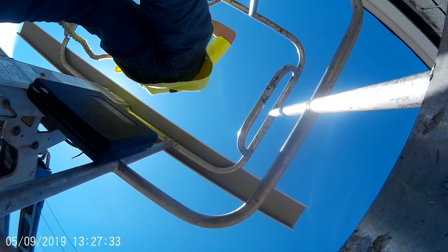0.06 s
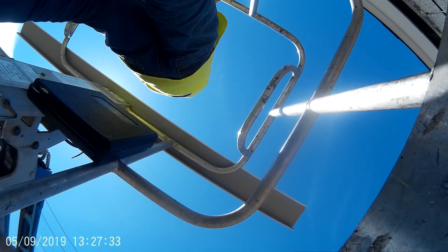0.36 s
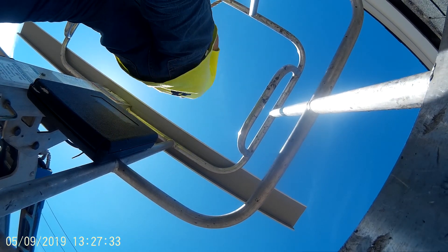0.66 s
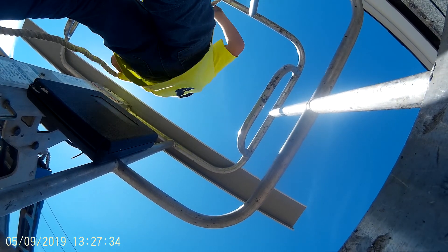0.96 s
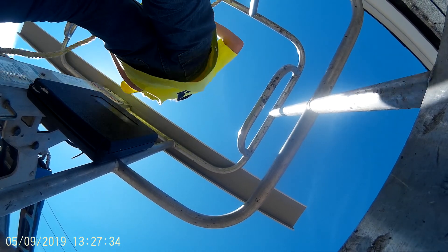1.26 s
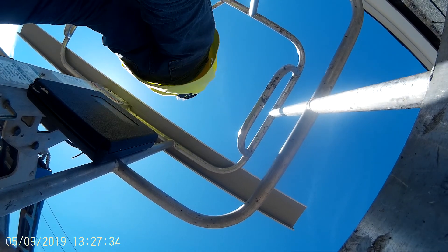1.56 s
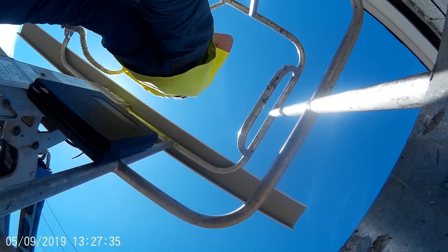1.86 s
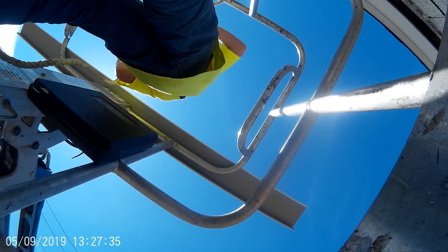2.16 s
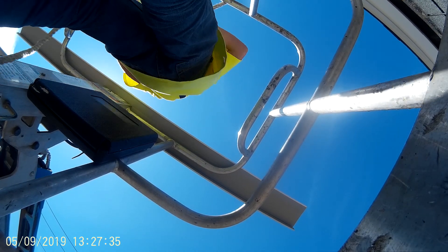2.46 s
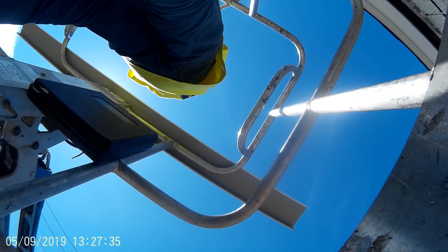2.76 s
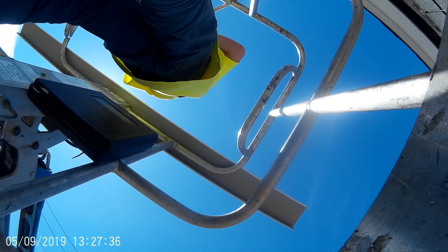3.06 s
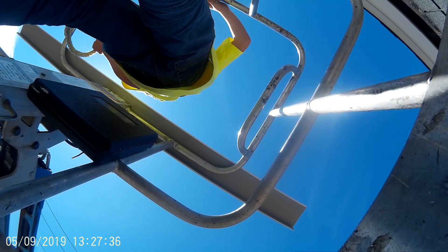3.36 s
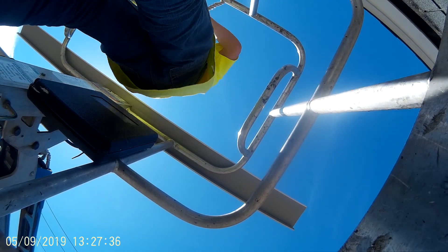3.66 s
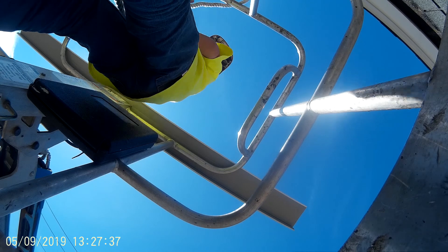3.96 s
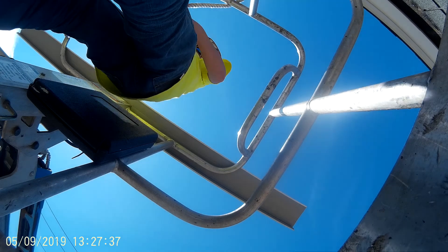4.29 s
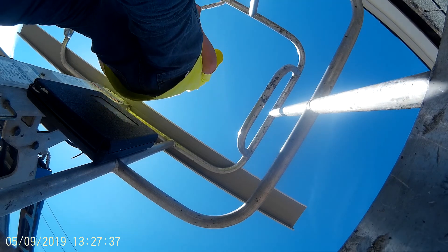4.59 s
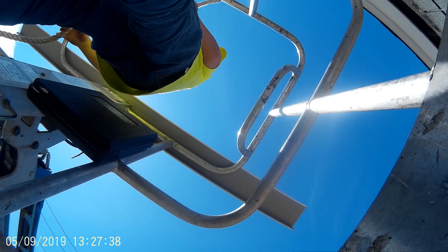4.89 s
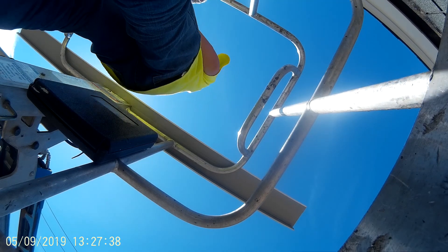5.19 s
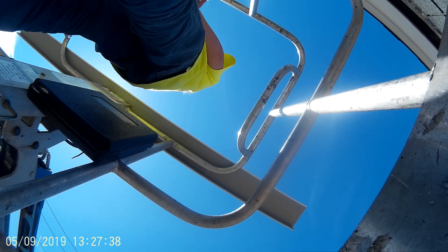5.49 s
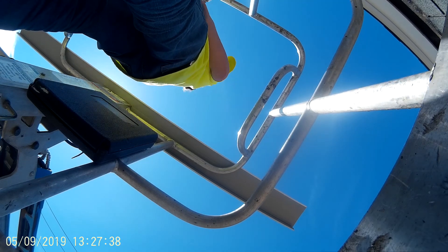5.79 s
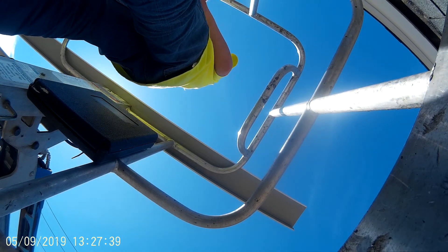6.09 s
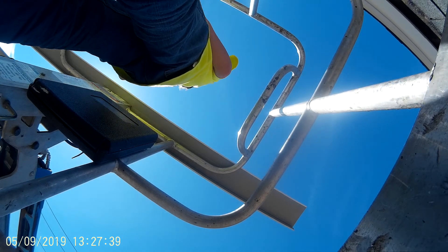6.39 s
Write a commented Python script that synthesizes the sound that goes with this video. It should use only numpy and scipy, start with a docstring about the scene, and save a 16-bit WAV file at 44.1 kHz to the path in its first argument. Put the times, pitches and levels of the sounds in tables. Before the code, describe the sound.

Heard in mono right on a metal hoist carriage outdoors, rope scrapes across an edge about twice a second, making the frame rumble and knock hollowly. A little past halfway, a harder knock and a sharp steel snap end the hauling. The rope then only scuffs now and then, and a loose fitting rattles lightly around a single ringing clank near the end. Faint open air lies underneath.

```python
"""First, right at the microphone, a rope rasps over the metal carriage of a ladder hoist: a worker on a
roof is hauling it hand over hand. Each pull rumbles in the frame, rasps as the strands slip over its
edge, and hisses with loose fibres. The carriage knocks in its play and a loose steel fitting snaps
against it; then come short scuffs, light rattles and one bright metal clank. Behind it all, quiet
outdoor air. Heard in mono from the carriage itself."""
import sys
import numpy as np
from scipy import signal
from scipy.fft import rfft, irfft
from scipy.io import wavfile
from scipy.ndimage import uniform_filter1d

SR = 44100
rng = np.random.default_rng(int(sys.argv[2]) if len(sys.argv) > 2 else 0)


def unload_audio(sound):
    """Save the sound as a 16-bit wav file, at the path given as the first command line argument."""
    columns = np.transpose(np.atleast_2d(sound))
    # keep every value between -1 and 1, then stretch to whole-number steps
    steps = np.round(np.clip(columns, -1, 1) * 32767)
    wavfile.write(sys.argv[1], SR, steps.astype(np.int16))


N = 288414
TIME = np.arange(N) / SR
BINS = np.fft.rfftfreq(8192, 1 / SR)

# Levels in the tables are relative; each source sets its own gain.
# open air around the roof: f/Hz, level/dB
AIR_SPECTRUM = [(15, -56.5), (25, -5), (119, 0.5), (340, -5), (537, -9), (1490, -17), (2850, -21),
                (5280, -26), (9050, -27), (9810, -26), (15500, -30.5)]
# faint hum and whine in the background: f/Hz, level/dB
HUM_TONES = [(113, -59), (9491, -100.5), (9561, -99)]

# resonances of the carriage frame: f/Hz, width/Hz, level/dB
FRAME_MODES = [(113,8,-8), (172,12,-11), (243,22,-7), (343,22,1), (497,30,-2), (545,26,-1), (640,35,-5),
               (917,38,-3), (1043,20,-13), (1282,18,-13), (1588,24,-9), (1793,20,-9), (1875,28,-8.5),
               (1978,30,-10), (2482,26,-15), (2616,26,-13), (2780,28,-22), (3890,45,-19), (4110,45,-20),
               (4315,45,-17), (4530,32,-23), (5040,70,-28)]
# the frame's broad response between them: f/Hz, level/dB
FRAME_BODY = [(24,-63), (40,-25), (85,-13), (160,-7.5), (286,-0.5), (395,-4.5), (530,-2), (780,-7),
              (1100,-8.5), (1400,-10), (1800,-6), (2110,-17), (2450,-8.5), (3080,-20), (4200,-23),
              (7000,-52), (15000,-67.5)]
# dull knocks of the carriage in its play: t/s, level/dB, f/Hz, swell/s
CARRIAGE_KNOCKS = [(0.338,-29,524,0.0061), (0.786,-22.5,523,0.0049), (1.201,-22,646,0.0097),
                   (1.787,-20,568,0.0037), (1.872,-28.5,504,0.0073), (1.957,-20.5,343,0.0047),
                   (2.053,-31,145,0.012), (2.61,-20,540,0.0031), (3.356,-41,470,0.0076),
                   (3.771,-12.5,638,0.0075), (3.8135,-5,600,0.0045), (4.978,-30,378,0.0045),
                   (5.0,-40,628,0.01), (5.69,-26.5,567,0.0061), (5.711,-21,561,0.0072),
                   (5.726,-23.5,521,0.0074), (5.752,-26,510,0.0074)]

# a loose steel fitting snaps against the carriage and bounces: t/s, level/dB, decay/s
FITTING_SNAPS = [(3.857,-13,0.0069), (3.892,-21.5,0.014), (3.931,-28.5,0.002)]
# the crack of that contact: f/Hz, level/dB
SNAP_SPECTRUM = [(120, -22), (200, -43), (671, -2.5), (1460, -13.5), (2460, -12.5), (3290, -14.5),
                 (3600, -19), (4640, -13.5), (6300, -32.5), (10800, -40.5), (15000, -54)]
# light rattles of the fitting: t/s, level/dB, decay/s
FITTING_RATTLES = [(6.026,-39,0.0067), (6.273,-43.5,0.016), (6.431,-43,0.0087), (6.467,-37.5,0.0074),
                   (6.508,-38.5,0.0095)]
# their duller contact: f/Hz, level/dB
RATTLE_SPECTRUM = [(120, -36), (200, -29), (646, 1), (1400, -17.5), (1850, -12.5), (2590, -25), (2890, -40),
                   (3760, -38), (8000, -47), (10400, -77), (17600, -120)]
# the fitting's ring: f/Hz, level/dB, t60/s
FITTING_MODES = [(780,-4,0.2), (835,-4,0.18), (931,-2,0.17), (1090,-4,0.2), (1340,-10,0.2), (1663,-15,0.18)]
# the clank, metal striking metal and chattering: t/s, level/dB, decay/s
CLANK_BLOWS = [(6.288, -5.5, 0.022), (6.301, -14.5, 0.0076), (6.311, -11.5, 0.0096)]
# the crash of that contact: f/Hz, level/dB
CLANK_SPECTRUM = [(59, -50), (100, -21), (391, -11), (472, -26), (764, -15.5), (904, -2), (1260, -21),
                  (1840, 1), (2050, -15), (2470, 0), (2920, -18.5), (3920, -5), (4640, -20), (8880, -30),
                  (15000, -42)]
# the struck metal's ring: f/Hz, level/dB, t60/s
CLANK_MODES = [(969,-15,0.18), (1367,-8,0.26), (1507,-12,0.19), (1600,-5,0.08), (1793,-7,0.13),
               (1857,-3,0.08), (2460,-9,0.13), (2670,-6,0.08), (2902,-15,0.1), (3058,-18,0.22),
               (3612,-13,0.094), (3800,-4,0.16), (3860,-6,0.09), (4317,-12,0.17), (5003,-13,0.14),
               (5560,-17,0.18), (6540,-24,0.2), (8393,-25,0.15), (9044,-20,0.09)]

# hiss of rubbing fibres: f/Hz, level/dB
FIBRE_SPECTRUM = [(2060, -31), (3500, -4), (4250, -16.5), (4900, -6.5), (6860, -13), (8160, -10.5),
                  (9240, -13), (10100, -16), (11600, -15.5), (15500, -30)]
# the slack rope creeps between scuffs: start/s, end/s, rumble/dB, rasp/dB, hiss/dB
ROPE_CREEP = (4.4, 5, -53, -71, -74.5)
# pulls: full speed from/s, until/s, rise/(dB/s), fall/(dB/s), rumble/dB, rasp/dB, hiss/dB
ROPE_PULLS = [(0.0, 0.348, 202, 232, -37, -47, -53.5), (.88, 1.061, 146, 178, -26.5, -41, -51),
              (1.178, 1.21, 150, 104, -37, -48.5, -56), (1.418, 1.544, 244, 175, -25, -42, -51),
              (1.97, 2.263, 106, 197, -34, -47.5, -53.5), (2.568, 2.693, 129, 167, -27, -41, -51.5),
              (3.099, 3.242, 168, 130, -31, -46, -53), (3.738, 3.815, 214, 520, -23.5, -33.5, -48),
              (3.872, 3.908, 900, 230, -27.5, -41, -51.5)]
# the rope bites into the edge at the height of a pull: t/s, half length/s, rasp/dB
ROPE_BITES = [(0.894, 0.019, -33), (.978, 0.015, -26.5), (1.035, 0.0071, -30), (1.506, 0.036, -26),
              (2.21, 0.033, -43), (2.598, 0.0099, -32.5), (2.662, 0.0091, -30), (2.70, 0.02, -24),
              (3.197, 0.014, -36), (3.221, .01, -36.5), (3.796, .018, -25.5)]
# scuffs as the rope is gripped or the load settles: t/s, rise/s, decay/s, rumble/dB, rasp/dB, hiss/dB
ROPE_SCUFFS = [(1.784, 0.0033, 0.037, -30.5, -40, -56), (4.233, 0.0031, 0.064, -35.5, -50, -68),
               (4.257, 0.018, 0.037, -27.5, -32.5, -49), (4.419, 0.0075, 0.065, -43, -62, -62.5),
               (4.606, 0.003, 0.056, -45, -62, -65), (4.70, 0.035, 0.075, -38, -55.5, -70),
               (4.755, .004, 0.017, -31.5, -34.5, -74), (4.877, .003, 0.12, -48.5, -63, -76),
               (4.958, 0.022, 0.049, -29.5, -46.5, -61), (5.094, 0.0066, 0.032, -26, -32, -49.5),
               (5.32, 0.013, 0.036, -46, -74, -78), (5.682, 0.022, 0.045, -29, -43, -50.5),
               (5.911, 0.0059, 0.026, -45.5, -71, -69.5)]
# sharp catches of the rope on the frame: t/s, rasp/dB, rumble/dB, hiss/dB
ROPE_CATCHES = [(0.001, -40, -21.5, -63), (0.028, -26, -38, -68), (0.05, -26.5, -23.5, -69),
                (0.86, -39, -22.5, -47), (0.952, -24.5, -23, -45), (1.2, -41, -21, -60),
                (1.61, -41, -36, -43), (2.017, -35.5, -27, -60), (2.184, -33.5, -28.5, -57),
                (2.38, -49, -35, -70), (2.44, -66, -33, -67), (2.541, -32.5, -34, -54),
                (2.636, -38, -48, -37), (2.915, -50, -46, -80), (3.02, -41, -51, -52),
                (3.04, -37, -47, -45), (3.05, -34.5, -44, -44.5), (3.172, -37, -23, -50),
                (3.356, -37.5, -27.5, -64), (3.629, -37, -39, -52), (3.711, -49, -43, -55),
                (3.735, -22, -35, -42)]


def amp(db):
    """Decibels to gain."""
    return 10 ** (np.asarray(db) / 20)


def unit(x):
    """Scales to rms 1."""
    return x / np.sqrt(np.mean(x ** 2) + 1e-20)


def shape(points):
    """Gain at every bin from points of f/Hz, level/dB."""
    hz, db = np.transpose(points)
    return amp(np.interp(np.log(BINS + 1), np.log(hz + 1), db))


def colour(x, gain):
    """Minimum-phase filter shaped like the gain, keeping the power of white noise."""
    log_gain = np.log(np.maximum(unit(gain), 1e-5))
    mirrored = np.concatenate([log_gain, log_gain[-2:0:-1]])
    taps = np.fft.ifft(np.exp(np.conj(signal.hilbert(mirrored)))).real
    return signal.oaconvolve(x, taps[:len(BINS)])[:len(x)]


def noise(envelope, gain):
    """White noise under an envelope, then coloured."""
    return colour(envelope * rng.standard_normal(N), gain)


def wander(rate_hz):
    """Smooth random drift of rms 1, rolling off above the rate."""
    hz = np.fft.rfftfreq(N, 1 / SR)
    return unit(irfft(rfft(rng.standard_normal(N)) * np.exp(-(hz / rate_hz) ** 2), N))


def burst(at, decay_s, rise_s):
    """Envelope of one contact: quick rise, exponential fall."""
    age = np.maximum(TIME - at, 0)
    return (1 - np.exp(-age / rise_s)) * np.exp(-age / decay_s)


def outdoors(air_db=-58.5, hum_db=-4, waver_hz=3):
    """The bed of the place: quiet air with a faint wavering hum and whine."""
    bed = noise(amp(air_db), shape(AIR_SPECTRUM))
    for hz, db in HUM_TONES:
        cycles = np.cumsum(hz + waver_hz * wander(26.4)) / SR
        bed += amp(hum_db + db) * np.sqrt(2) * np.sin(2 * np.pi * cycles)
    return bed


def frame_response(body_db=-3, modes_db=1):
    """The frame's resonances standing on its broad response, added in power."""
    peaks = sum(amp(db) ** 2 / (1 + ((BINS - hz) / width) ** 2) ** 2 for hz, width, db in FRAME_MODES)
    return np.sqrt((amp(body_db) * shape(FRAME_BODY)) ** 2 + amp(modes_db) ** 2 * peaks)


def shudder(force, top_hz):
    """The frame shaking dully under a force envelope."""
    return noise(force, frame_response() / (1 + (BINS / top_hz) ** 2))


def carriage_knocks(blow_db=-1, shake_db=-21, hollow_db=-21, hollow_hz=520):
    """A soft blow swells and dies within a few cycles and leaves the frame shaking and ringing hollow."""
    blow, shake, hollow = np.zeros((3, N))
    for at, db, hz, swell_s in CARRIAGE_KNOCKS:
        age = np.maximum(TIME - at, 0)
        swell = (age / swell_s * np.exp(1 - age / swell_s)) ** 3
        blow += amp(db) * swell * np.sin(2 * np.pi * hz * age)
        shake += amp(db) * burst(at, decay_s=0.051, rise_s=0.0029)
        hollow += amp(db) * burst(at, decay_s=0.055, rise_s=0.005) * np.sin(2 * np.pi * hollow_hz * age)
    return amp(blow_db) * blow + amp(shake_db) * shudder(shake, top_hz=1123) + amp(hollow_db) * hollow


def struck_metal(blows, spectrum, modes, crash_db, ring_db, shake_db, shake_decay_s):
    """Hard blows close by: a dense crash, thin metal ringing, and a low shudder of the frame."""
    contact, ring, shake = np.zeros((3, N))
    for at, db, decay_s in blows:
        contact += amp(db) * burst(at, decay_s, rise_s=0.00059)
        shake += amp(db) * burst(at, shake_decay_s, rise_s=0.0044)
        start = round(at * SR)
        age = TIME[:min(SR // 2, N - start)]
        onset = 1 - np.exp(-age / 0.00037)
        for hz, mode_db, t60 in modes:
            tone = np.sin(2 * np.pi * (hz * age + rng.random()))
            ring[start:start + len(age)] += amp(db + mode_db - 60 * age / t60) * onset * tone
    crash = noise(contact, shape(spectrum))
    return amp(crash_db) * crash + amp(ring_db) * ring + amp(shake_db) * shudder(shake, top_hz=1410)


def stroke(start, end, rise_db_per_s, fall_db_per_s):
    """Rope speed in dB relative to full speed: it gathers, holds, and runs out."""
    return -rise_db_per_s * np.maximum(start - TIME, 0) - fall_db_per_s * np.maximum(TIME - end, 0)


def friction(rasp_slope=0.78, hiss_slope=0.61, bite_hiss_db=-21):
    """Rumble, rasp and hiss envelopes follow rope speed; creep, pulls, bites and scuffs add in power."""
    start, end, *levels = ROPE_CREEP
    creep = amp(stroke(start, end, rise_db_per_s=250, fall_db_per_s=41))
    power = (amp(levels)[:, None] * creep) ** 2 + 1e-14
    for *timing, rumble_db, rasp_db, hiss_db in ROPE_PULLS:
        speed = stroke(*timing)
        power += amp([rumble_db + speed, rasp_db + rasp_slope * speed, hiss_db + hiss_slope * speed]) ** 2
    for at, half_length_s, db in ROPE_BITES:
        swell = np.exp(-((TIME - at) / half_length_s) ** 2)
        power[1:] += amp([[db], [db + bite_hiss_db]]) ** 2 * swell  # rasp and hiss only
    for at, rise_s, decay_s, *levels in ROPE_SCUFFS:
        power += (amp(levels)[:, None] * burst(at, decay_s, rise_s)) ** 2
    return np.sqrt(power)


def strand_slips(strands_hz=83, jitter=0.3, spread_db=4.0, release_cycles=0.42, sliding=0.33):
    """Strand after strand snags on the edge and lets go, each with its own force, over steady sliding."""
    strands = np.cumsum(strands_hz * np.exp(jitter * wander(45))) / SR
    force = amp(spread_db * np.clip(rng.standard_normal(N), -2, 1.5))[strands.astype(int)]
    return unit(sliding + force * np.exp(-(strands % 1) / release_cycles))


def moving_contact(sound, spread_db=2, full_above_hz=1500):
    """As the rope wanders along the edge it favours now some resonances, now others."""
    hz, _, spectra = signal.stft(sound, SR, nperseg=512, noverlap=384)
    patches = rng.standard_normal(spectra.T.shape).T
    for size, axis in (16, 1), (10, 1), (2, 0):  # smooth twice in time, once in frequency
        patches = uniform_filter1d(patches, size, axis)
    reach = np.minimum(hz / full_above_hz, 1)[:, None]  # short bending waves feel the move most
    spectra *= amp(spread_db * reach * unit(patches))
    return signal.istft(spectra, nperseg=512, noverlap=384)[1][:N]


def rope(split_hz=1200, bright_hz=3300, fibres_db=-1, bright_db=-3.0, grip_db=1.0):
    """Slipping strands and sharp catches drive the frame; the fibres hiss straight at the microphone."""
    rumble, rasp, hiss = friction()
    slip = unit(strand_slips() * amp(grip_db * wander(46.1)))  # the grip tightens and eases
    rumble *= unit(slip ** 0.43)
    rasp *= slip
    hiss *= amp(fibres_db) * unit(slip ** 0.38)
    for at, rasp_db, rumble_db, hiss_db in ROPE_CATCHES:
        catch = burst(at, decay_s=0.011, rise_s=0.00055)
        rumble = np.hypot(rumble, amp(rumble_db) * catch)
        rasp = np.hypot(rasp, amp(rasp_db) * catch)
        hiss = np.hypot(hiss, amp(hiss_db) * catch)
    bright = amp(bright_db) * rasp * (hiss / rasp) ** 0.4  # a fast, hissing rope sharpens the rasp
    # heavy drag moves the whole frame, small slips only its higher modes
    low = 1 / (1 + (BINS / split_hz) ** 8)
    high = 1 - 1 / (1 + (BINS / bright_hz) ** 8)
    middle = (1 - low) * (1 - high)
    frame = frame_response()
    through_frame = noise(rumble, frame * low) + noise(rasp, frame * middle) + noise(bright, frame * high)
    return through_frame + noise(hiss, shape(FIBRE_SPECTRUM))


def scene():
    """One microphone at the carriage: rope and metal close up, open air behind."""
    snaps = struck_metal(FITTING_SNAPS, SNAP_SPECTRUM, FITTING_MODES,
                         crash_db=-1.5, ring_db=-7.5, shake_db=-22, shake_decay_s=0.017)
    rattles = struck_metal(FITTING_RATTLES, RATTLE_SPECTRUM, FITTING_MODES,
                           crash_db=1.0, ring_db=-14, shake_db=-7.5, shake_decay_s=0.033)
    clank = struck_metal(CLANK_BLOWS, CLANK_SPECTRUM, CLANK_MODES,
                         crash_db=-10, ring_db=-15.5, shake_db=-28, shake_decay_s=0.059)
    return (moving_contact(rope()) + carriage_knocks() + snaps + rattles + clank + outdoors())[None]


def record(dry, housing_hz=9530, width_hz=70, housing_db=3, top_hz=15780):
    """A thin resonance of the housing around the microphone, then the band limit."""
    resonance = amp(housing_db) / (1 + ((BINS - housing_hz) / width_hz) ** 2) ** 2
    housed = colour(dry[0], 1 + resonance)
    lowpass = signal.firwin(511, top_hz, window=("kaiser", 9), fs=SR)
    return signal.oaconvolve(housed, lowpass, "same")[None]


dry = scene()
out = record(dry)
unload_audio(out)
```